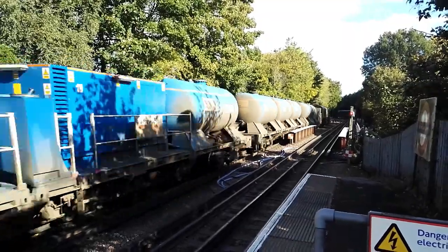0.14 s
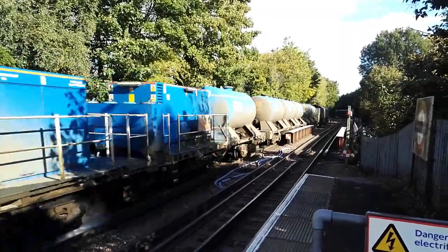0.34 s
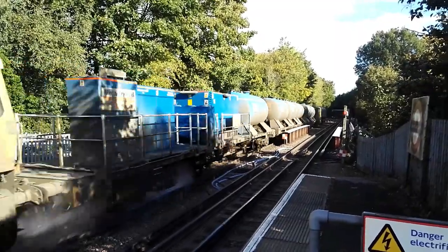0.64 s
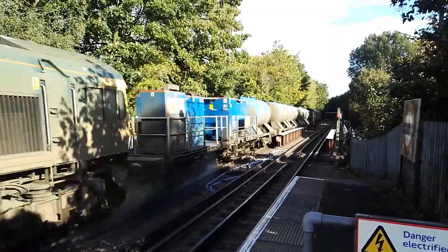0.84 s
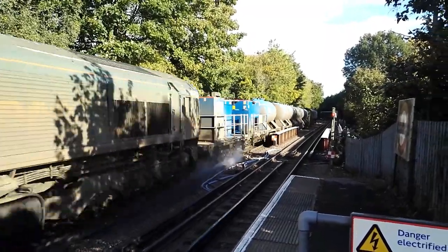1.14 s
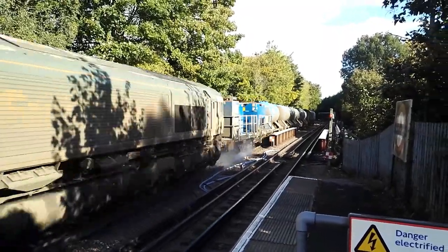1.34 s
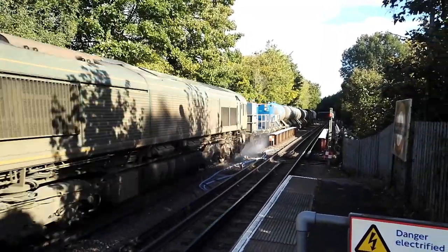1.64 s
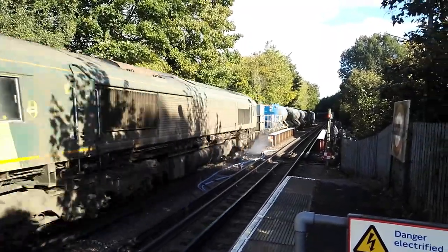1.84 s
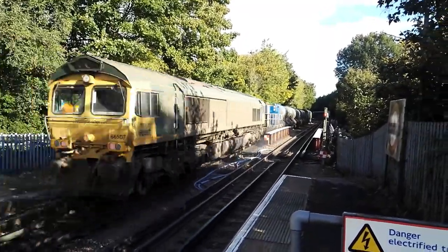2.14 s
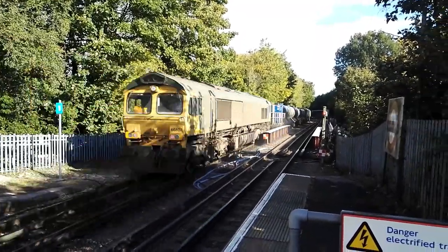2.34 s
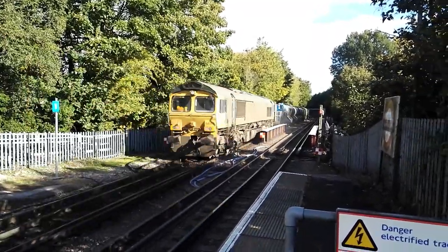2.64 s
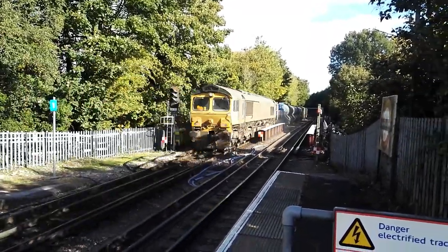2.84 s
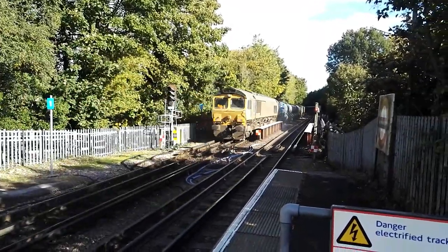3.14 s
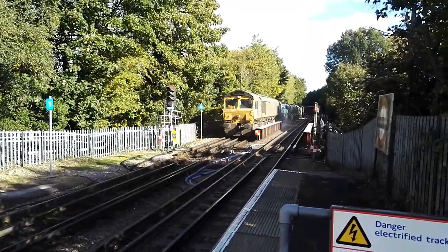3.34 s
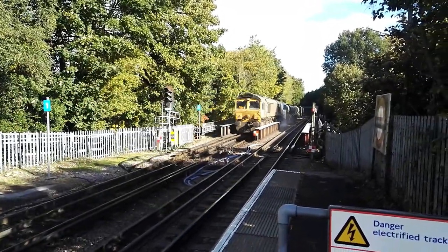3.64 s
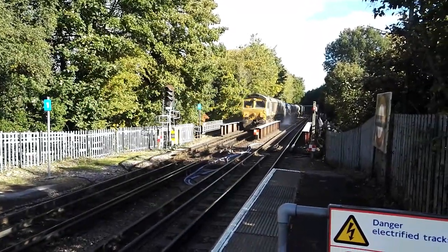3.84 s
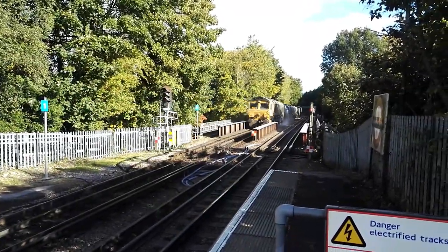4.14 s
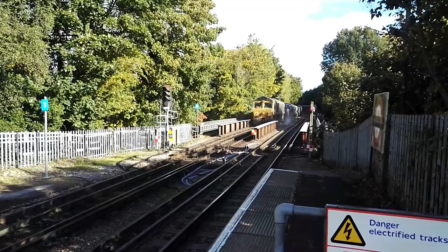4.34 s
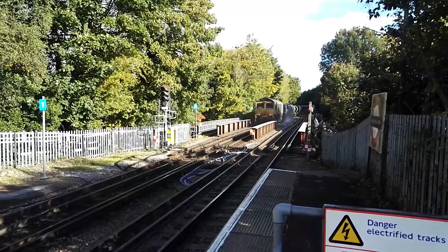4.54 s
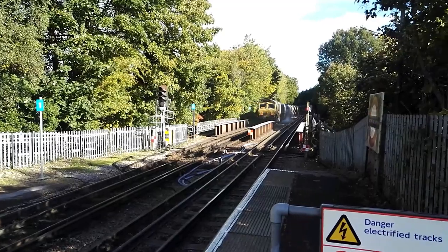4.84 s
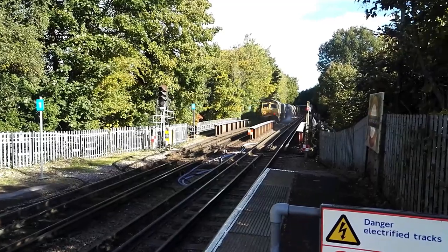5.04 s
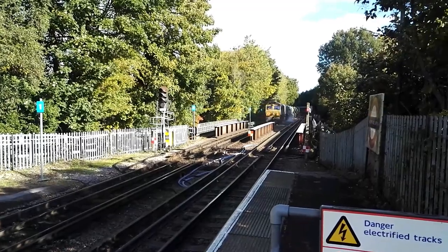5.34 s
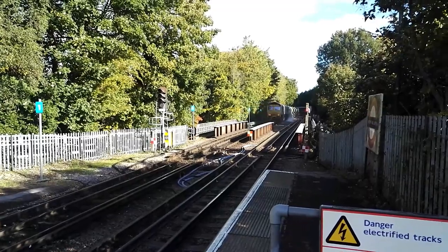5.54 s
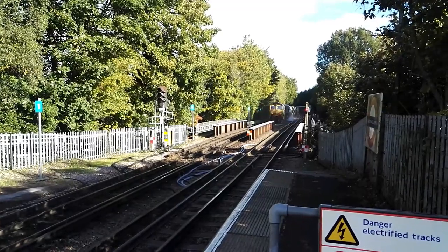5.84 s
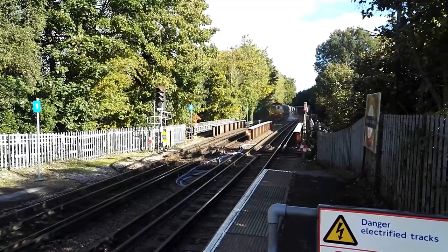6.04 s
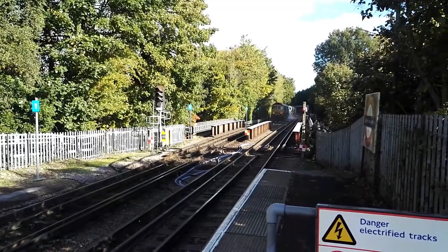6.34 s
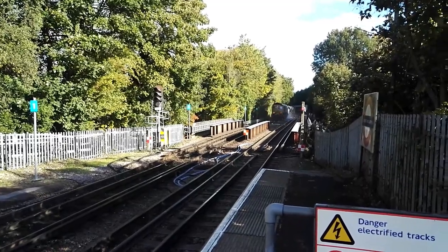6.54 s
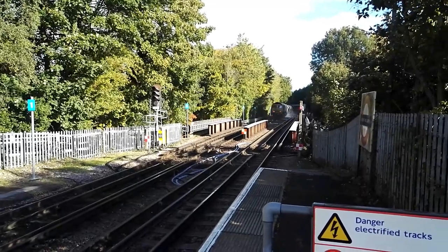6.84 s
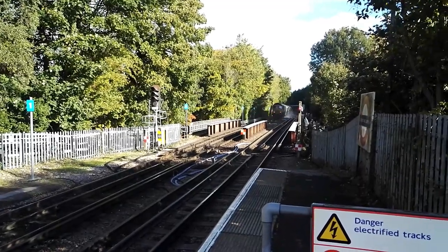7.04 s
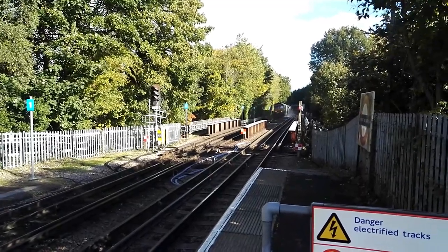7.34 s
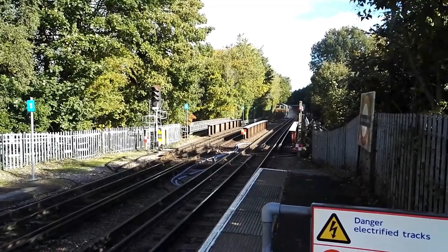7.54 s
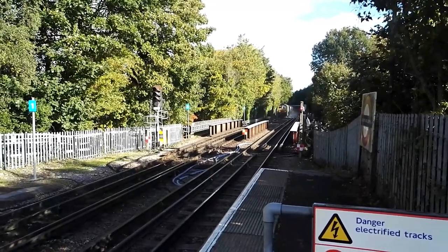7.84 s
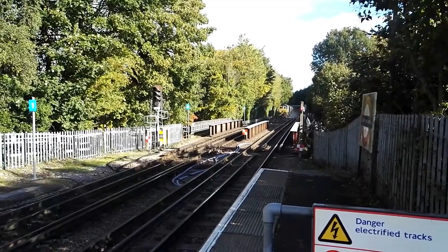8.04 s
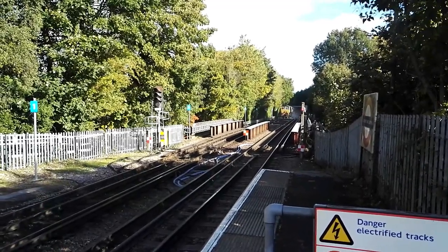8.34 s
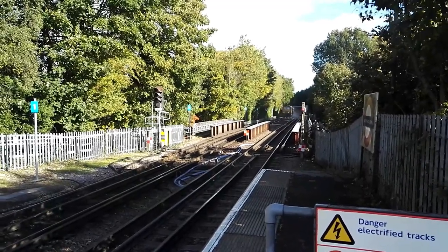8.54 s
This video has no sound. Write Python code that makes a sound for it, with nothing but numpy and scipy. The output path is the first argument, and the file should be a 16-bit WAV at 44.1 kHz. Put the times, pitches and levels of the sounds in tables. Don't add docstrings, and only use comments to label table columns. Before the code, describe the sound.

Close beside the track, a rail-cleaning train is already passing: bright wet hiss of water jets, gusty low rumble, rolling wheels and joint knocks over a throbbing diesel. A sharp double burst of spray comes just after one second, then everything recedes, treble first. Regular little axle chirps and a few thin, high squeals follow, leaving faint engine hum and quiet open air. Stereo, small handheld microphones outdoors.

```python
import sys
import numpy as np
from scipy import signal
from scipy.fft import rfft, irfft
from scipy.io import wavfile
from scipy.ndimage import uniform_filter1d

SR = 44100
rng = np.random.default_rng(int(sys.argv[2]) if len(sys.argv) > 2 else 0)


def boost(x):
    u = np.asarray(x, float) / 20
    return 10 ** u


def wrap_up_sound(samples):
    columns = np.atleast_2d(samples).T
    tamed = np.clip(columns, -1, 1)
    steps = np.round(tamed * 32767).astype(np.int16)
    wavfile.write(sys.argv[1], SR, steps)


N = 384111
HOP, SIZE = 128, 512

# time_s, level_db
JET_LEVEL = [(0.0, -27.5), (0.12, -30.5), (0.19, -29.5), (0.36, -33.5), (1.07, -40), (1.3, -37.5),
             (1.55, -43), (1.82, -45), (2.35, -52), (3.06, -58), (3.54, -55.5), (4.05, -60), (5.07, -58.5),
             (5.24, -62.5), (5.41, -59), (6.33, -62.5), (7.5, -65), (8.71, -64)]
# frequency_hz, density_db
JET_BODY = [(710, -19), (1200, -9.5), (1420, -8), (1610, -12.5), (1750, -5.5), (2030, -4), (3060, -0.5),
            (7000, -5), (9100, -12), (15400, -120)]
# frequency_hz, density_db
JET_FIZZ = [(2940, -12), (5000, -7), (5950, -6.5), (8580, 1), (11500, -5), (15000, -15.5), (22000, -120)]
# frequency_hz, density_db
SPRAY_TOP = [(9300, -13), (10300, 5), (11200, -1), (12300, 0.5), (13500, 0), (14600, -5.5)]
# peak_s, rise_s, fall_s, fizz_db, spray_db
BLASTS = [(0.03, 0.034, 0.046, -70, -23), (1.31, 0.017, 0.057, -32, -46), (1.42, 0.063, 0.047, -30.5, -30),
          (2.63, .04, .09, -59, -58.5), (3.5, 0.2, .08, -56.5, -68), (3.69, .1, .1, -62, -55.5),
          (3.88, .07, 0.051, -64, -58), (4.23, 0.048, 0.078, -61, -56.5), (4.06, 0.058, .05, -67.5, -65),
          (4.52, .08, .08, -62, -66), (4.98, .08, 0.099, -69, -62), (5.42, 0.086, 0.18, -79, -61.5),
          (5.85, .15, 0.16, -70.5, -73)]
# frequency_hz, density_db
BLAST_TOP = [(8800, -22), (10300, -5), (11300, 0.5), (12300, 1.5), (13500, -1), (14600, -7)]
# time_s, level_db (against alongside)
NEARNESS = [(0, 1), (1.2, -2.5), (1.65, -5), (2.05, -6), (2.4, -12), (2.8, -15.5), (3.5, -18.5),
            (4.25, -22.5), (5.25, -23), (5.7, -20), (6.3, -24), (7.0, -22.5), (7.8, -23.5), (8.2, -23.5),
            (8.71, -22)]
# frequency_hz, density_db
RAIL = [(260, -43.5), (440, -7.5), (737, 0), (860, -9), (1000, -18.5), (1300, -41.5), (2200, -120)]
# frequency_hz, density_db
WHEEL_WEBS = [(470, -17), (800, -8.5), (955, -5.5), (1420, -5), (1610, -0.5), (1750, -5.5), (2300, -6.5),
              (2990, -43), (5060, -120)]
# peak_s, level_db
KNOCKS = [(.02, -36.5), (.17, -45), (.26, -49), (.48, -45), (.61, -45), (.9, -48), (1.07, -43), (1.67, -57),
          (1.99, -48), (2.11, -56), (2.25, -53), (2.38, -62), (2.62, -60), (3.55, -61.5), (5.9, -63),
          (6.45, -72), (8.1, -65)]
# frequency_hz, density_db
RUMBLE_COLOUR = [(12, -47), (20, -18), (32, -11), (56, -4.5), (70, 4.5), (124, 0), (300, -1), (365, -11),
                 (470, -26), (790, -120)]
# peak_s, rise_s, fall_s, level_db
GUSTS = [(0.02, .02, 0.018, -44), (.19, 0.045, .02, -43), (.31, .015, .025, -40), (.75, .02, .06, -55),
         (.9, 0.0099, 0.04, -42.5), (1.19, 0.1, 0.019, -44), (1.33, 0.034, 0.055, -47),
         (1.66, .03, .03, -54), (1.75, 0.035, .025, -47), (1.87, .03, 0.043, -46.5),
         (1.99, 0.019, 0.025, -42.5), (2.69, .05, .03, -64), (3.15, 0.03, .1, -71),
         (4.41, 0.11, 0.093, -54.5), (4.69, 0.046, 0.023, -56.5), (4.96, 0.038, .05, -56),
         (5.42, .04, 0.12, -61.5), (5.77, .04, 0.044, -60.5), (5.92, .05, .08, -66), (6.42, 0.05, .05, -61),
         (6.56, 0.048, .05, -63.5), (8.1, .05, .2, -67)]
# frequency_hz, density_db
BOGIE_DRONE = [(290, -16), (335, -4), (400, 5.5), (470, -7.5), (560, -14)]
# peak_s, rise_s, fall_s, level_db
BOGIE_PASSES = [
    (1.2, 0.29, .35, -48.5),
    (2.05, 0.13, 0.34, -56.5),
]
# time_s, beat_db, second_order_db (over the beat)
EXHAUST = [(0.0, -59, 5), (0.35, -47, -30), (1.2, -57.5, -6), (1.55, -62, 2), (2.5, -58.5, -15),
           (3.1, -65, -4), (3.8, -67.5, -2), (4.5, -68.5, -2.5), (5.2, -67.5, -11), (6.8, -69, -9),
           (7.5, -65.5, -16), (8.2, -63.5, -13.5), (8.71, -65, -17)]
# peak_s, level_db
SURGES = [(.03, -54), (.3, -47), (.58, -46), (.79, -44.5), (.99, -48), (1.24, -48), (1.36, -59),
          (2.52, -58), (3.14, -56.5), (3.56, -59.5), (3.84, -60.5), (4.29, -59.5), (4.54, -61), (4.97, -70),
          (5.52, -69), (7.2, -62), (8.07, -67), (8.25, -62), (8.4, -64)]
# start_s, level_db
CHIRPS = [(1.62, -49), (1.94, -53), (2.26, -56), (2.575, -61), (2.886, -63), (3.22, -70), (4.47, -69),
          (5.09, -67), (5.7, -71), (7.07, -69), (7.671, -74), (8.23, -71)]
# start_s, length_s, pitch_hz, level_db, left_right_db
SQUEALS = [
    (3.87, .16, 12330, -63, 3),
    (5.29, .12, 11650, -67, 3),
    (5.31, .27, 12278, -64, 4),
    (5.56, .2, 12270, -71, 4),
    (5.42, .16, 11360, -69, 3),
]
# frequency_hz, density_db
STILL_AIR = [(12, -40), (20, -9), (75, 0.5), (133, -16), (212, -8), (368, -23), (620, -9), (911, -15.5),
             (1170, -13), (5900, -33), (11700, -32.5), (14400, -36.5)]
# frequency_hz, likeness (0 to 1)
COHERENCE = [(30, 0.6), (70, 0.86), (150, 0.93), (300, 0.86), (600, 0.62), (1200, 0.189), (2500, .38),
             (5000, 0.22), (9000, .05)]
# frequency_hz, lead_rad
PORT_LEAD = [(0, 1), (600, -0.98), (2070, 6.5), (3010, 4.0), (4740, 5.5), (8530, 15.5), (10100, 19),
             (13000, 3.5), (14900, 4)]
# frequency_hz, left_right_db
PORT_LEAN = [(60, 0.5), (150, -1), (380, 0.0), (600, 1.0), (1100, 1.5), (2360, 0.5), (5900, -7.5),
             (14800, 5.5)]
# frequency_hz, width_hz, gain_db
PORT_PEAKS = [(1130, 120, 2.5), (2870, 150, 2), (4650, 200, 2.5), (5900, 200, 2.5), (11650, 350, 3)]
GAIN_STEPS = [
    5.3,
    6.66,
    7.96,
]
# frequency_hz, risk_bright, risk_dull (under bright and dull sound)
MASKED = [(2000, 0, 0), (2700, .9, 0), (3400, 1.03, 0), (4400, .78, 0), (6200, .55, 0), (8500, 0, .45),
          (10300, .4, .95), (11600, 0, .5), (12600, .4, 1.1), (13600, .5, 1.05), (14300, .7, 1.12)]


def evened(x):
    return x / np.sqrt(np.mean(np.abs(x) ** 2) + 1e-20)


def curves(rows, t):
    s, *columns = np.transpose(rows)
    return [np.interp(t, s, c) for c in columns]


def read(points, hz):
    f, value = np.transpose(points)
    return np.interp(np.log(hz + 1), np.log(f + 1), value)


def drift(t, low_hz, high_hz):
    rates_hz = np.geomspace(low_hz, high_hz, num=30)
    return evened(sum(np.sin(2 * np.pi * (f * t + rng.random())) / np.sqrt(f) for f in rates_hz))


def wobble(t, low_hz, high_hz):
    slow = t[::HOP]
    return np.interp(t, slow, drift(slow, low_hz, high_hz))


def bursts(base_db, rows, t):
    slow = t[::HOP]
    power = boost(2 * base_db[::HOP])
    for s, rise, fall, db in rows:
        power = power + boost(2 * db) * np.exp(-((slow - s) / np.where(slow < s, rise, fall)) ** 2)
    return np.interp(t, slow, 10 * np.log10(power))


def wash(colour, patchy_db, flicker_db, flicker_hz):
    hz = np.fft.rfftfreq(4 * SIZE, 1 / SR)
    frame_count = N // SIZE + 5
    a, b, c, d, patches = rng.standard_normal((frame_count, len(hz), 5)).T
    patches = uniform_filter1d(patches, size=16, axis=0)
    patches = evened(uniform_filter1d(patches, size=6, axis=1))
    same = np.clip(read(COHERENCE, hz), 0, 1)[:, None]
    right = a + 1j * b
    shared = same * right * np.exp(1j * read(PORT_LEAD, hz))[:, None]
    left = shared + np.sqrt(1 - same ** 2) * (c + 1j * d)
    inside = (hz >= colour[0][0]) & (hz <= colour[-1][0])
    z = np.array([left, right]) * boost(read(colour, hz)[:, None] + patchy_db * patches) * inside[:, None]
    sound = evened(signal.istft(z, nperseg=4 * SIZE, noverlap=3 * SIZE)[1][:, :N])
    slow = np.arange(N // HOP + 5) * HOP / SR
    flicker = np.interp(np.arange(N) / SR, slow, drift(slow, 1.6, flicker_hz))
    return sound * boost(flicker_db * flicker)


def jets(t):
    body_db = curves(JET_LEVEL, t)[0]
    steady_db = body_db + 3.5 - 1.5 * t + 5 * np.exp(-t / 0.6)
    fizz_blasts = [(s, rise, fall, fizz) for s, rise, fall, fizz, _ in BLASTS]
    spray_blasts = [(s, rise, fall, spray) for s, rise, fall, _, spray in BLASTS]
    fizz_db = bursts(steady_db, fizz_blasts, t)
    spray_db = steady_db - 3.5 - 2.4 * t
    blast_db = bursts(spray_db - 20, spray_blasts, t)
    pan_db = 2.5 + 5 * np.exp(-t / 0.4)
    sides = boost(np.array([.5 * pan_db, -.5 * pan_db]))
    body = boost(body_db) * wash(JET_BODY, 0.97, 0.25, 11) * sides ** .45
    fizz = boost(fizz_db) * wash(JET_FIZZ, 0.607, 0.18, 30) * sides
    spray = boost(spray_db) * wash(SPRAY_TOP, 1.2, 0.97, 24) * sides
    blasts = boost(blast_db) * wash(BLAST_TOP, 3.0, 0.71, 24) * sides
    return boost(1.5) * (body + fizz + spray + blasts)


def rolling(t, near_db):
    knock_rise_s, knock_fall_s, web_knock_db = 0.019, 0.016, -3.5
    knocks = [(s, knock_rise_s, knock_fall_s, db) for s, db in KNOCKS]
    jolts_db = 1.1 * wobble(t, 2.5, 10)
    rail_db = bursts(-45.5 + near_db + jolts_db, knocks, t)
    web_db = bursts(-48.5 + 0.86 * near_db - web_knock_db, knocks, t) + web_knock_db
    rail = boost(rail_db + 0.5) * wash(RAIL, 1.8, 0.27, 25)
    return rail + boost(web_db + 1.0) * wash(WHEEL_WEBS, 1.5, 0.4, 35)


def engine(t):
    firing_hz = 74.1 - 0.24 * t
    beat_db, second_db = curves(EXHAUST, t)
    surge_s = 0.033
    surges = [(s, surge_s, surge_s, db) for s, db in SURGES]
    beat = orders(t, firing_hz, [(0.97, bursts(beat_db, surges, t))], 0.031, 0.9, 25)
    second = orders(t, firing_hz, [(2, beat_db + second_db)], .004, 1.36, 12)
    late = t - 6.06
    fan_levels = [(2, -76 + 0.45 * late), (3, -89 + 6 * late)]
    fan = orders(t, 100, fan_levels, 0.0096, 4.6, 14) * np.clip(late / 0.35, 0, 1)
    return beat + second + fan


def orders(t, hz, levels, wander, throb_db, throb_hz):
    turns = np.cumsum(hz * (1 + wander * wobble(t, 1.5, 25))) / SR
    throb = boost(throb_db * wobble(t, 4.4, throb_hz))
    return throb * sum(np.sqrt(2) * boost(db) * np.sin(2 * np.pi * k * turns) for k, db in levels)


def bearing_chirps():
    rows = []
    for s, db in CHIRPS:
        pitch_hz = 1634 + 25 * np.exp(-s / 2.6)
        rows.append((s, 0.067, pitch_hz, db, 5))
    return rings(rows, 4.7, 0.39)


def flange_squeals():
    return rings(SQUEALS, 12.0, 0.75)


def rings(rows, waver_hz, edge):
    out = np.zeros((2, N))
    for s, length, hz, db, pan_db in rows:
        t = np.arange(0, length, 1 / SR)
        turns = np.cumsum(hz + waver_hz * drift(t, 6.9, 60)) / SR
        tone = np.sin(2 * np.pi * turns) * signal.windows.tukey(len(t), edge)
        tone = tone * boost(db - 0.5 + 1.5 * drift(t, 10.5, 63))
        out[:, round(s * SR):][:, :len(t)] += tone * boost(np.array([[.5], [-.5]]) * pan_db)
    decay_db = -60 * np.arange(5000) / SR / 0.12
    echo = rng.standard_normal((2, 5000)) * boost(decay_db)
    echo = echo / np.linalg.norm(echo[0])
    return out + boost(-18) * signal.oaconvolve(out, echo, axes=1)[:, :N]


def rumble(t, near_db):
    heave_db = 1.24 * wobble(t, 3.4, 17)
    body_db = bursts(-44.5 + 1.1 * near_db + heave_db, GUSTS, t)
    lumps = uniform_filter1d(rng.standard_normal(N), size=400)
    lumps = evened(uniform_filter1d(lumps, size=400))
    body = boost(1.5 * lumps) * wash(RUMBLE_COLOUR, 0.48, 0.26, 6.6)
    drone_db = bursts(-49.5 + 1.33 * near_db, BOGIE_PASSES, t)
    return boost(body_db) * body + boost(drone_db) * wash(BOGIE_DRONE, 2.0, 0.24, 11)


def still_air():
    return boost(-62.5) * wash(STILL_AIR, 0.86, .5, 8)


def scene():
    t = np.arange(N) / SR
    near_db = curves(NEARNESS, t)[0]
    train = jets(t) + rolling(t, near_db) + engine(t) + bearing_chirps() + flange_squeals()
    return train + rumble(t, near_db) + still_air()


def mask_cells(x):
    hz, _, z = signal.stft(x, SR, nperseg=2 * SIZE, noverlap=3 * SIZE // 2)
    power = uniform_filter1d((abs(z) ** 2).sum(0), size=12, axis=1) + 1e-20
    treble = power[hz > 9000].sum(0)
    middle = power[(hz > 2500) & (hz < 4500)].sum(0)
    tilt_db = 10 * np.log10(treble / middle)
    bright = np.clip(np.minimum((tilt_db + 30) / 35, (tilt_db + 12) / 12), 0, 1.2)
    dull = np.clip((7.5 - tilt_db) / 15, 0, 1)
    risk_bright, risk_dull = curves(MASKED, hz)
    risk = risk_bright[:, None] * bright + risk_dull[:, None] * dull
    chance = rng.standard_normal(power.T.shape).T
    chance = uniform_filter1d(chance, size=5, axis=0)
    chance = evened(uniform_filter1d(chance, size=8, axis=1))
    kept = np.clip(14 * (3.6 - 3.0 * risk - chance), .01, 1)
    return signal.istft(z * kept, SR, nperseg=2 * SIZE, noverlap=3 * SIZE // 2)[1][:, :N]


def band_limit(x):
    return signal.sosfilt(signal.butter(12, 14280, fs=SR, output="sos"), x)


def record(dry):
    t = np.arange(N) / SR
    lift_db = sum(1.5 * np.clip((t - s) / 0.017, 0, 1) * np.exp(-np.abs(t - s) / 0.72) for s in GAIN_STEPS)
    padded = N + SR
    hz = np.fft.rfftfreq(padded, 1 / SR)
    colour_db = sum(db / (1 + (2 * (hz - f) / width) ** 2) for f, width, db in PORT_PEAKS)
    response = boost(colour_db + np.array([[.5], [-.5]]) * read(PORT_LEAN, hz))
    ports = irfft(rfft(dry * boost(lift_db), padded) * response, padded)[:, :N]
    return band_limit(mask_cells(ports))


dry = scene()
out = record(dry)
wrap_up_sound(out)
```